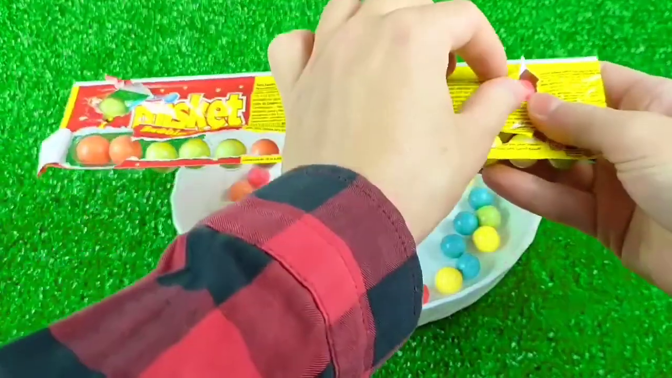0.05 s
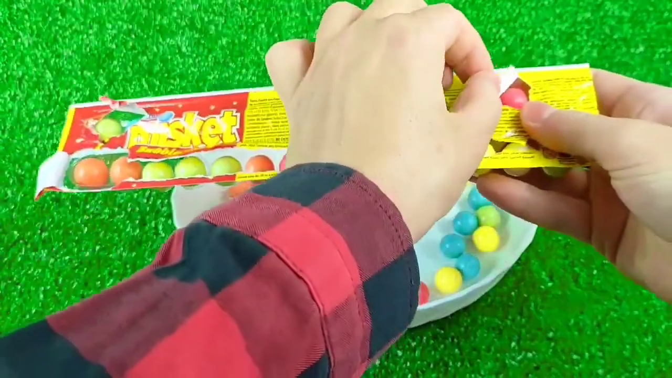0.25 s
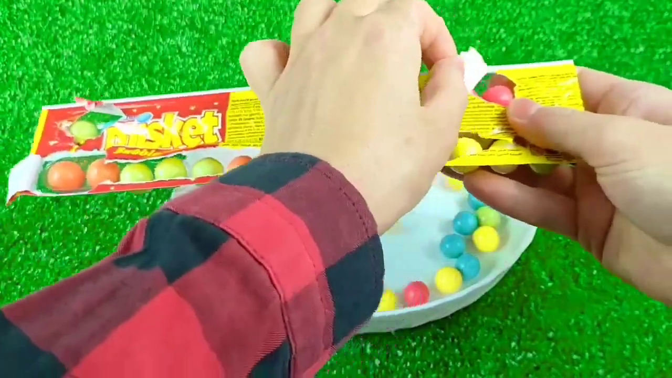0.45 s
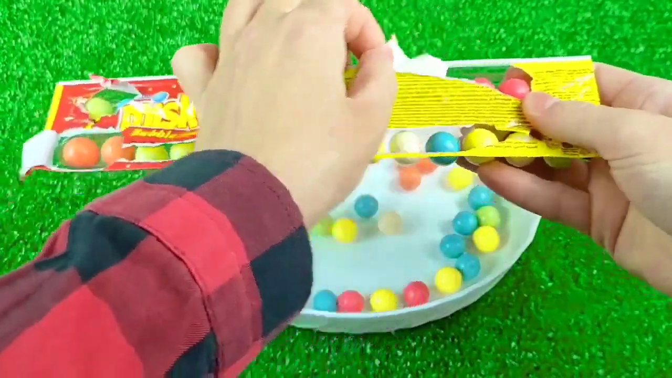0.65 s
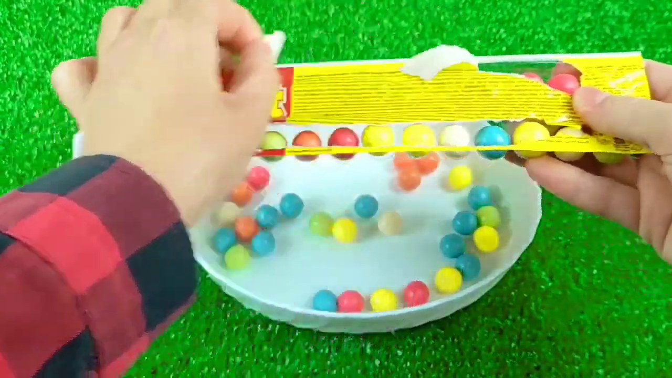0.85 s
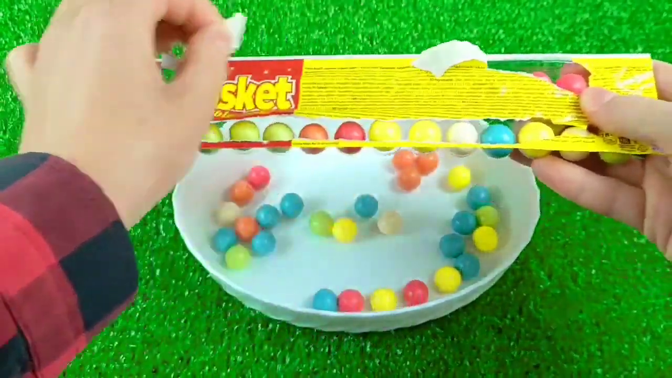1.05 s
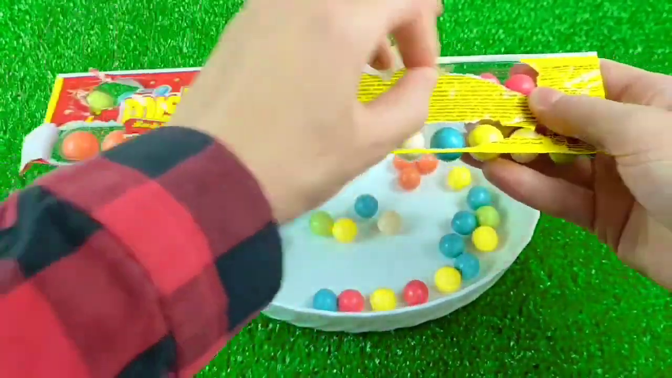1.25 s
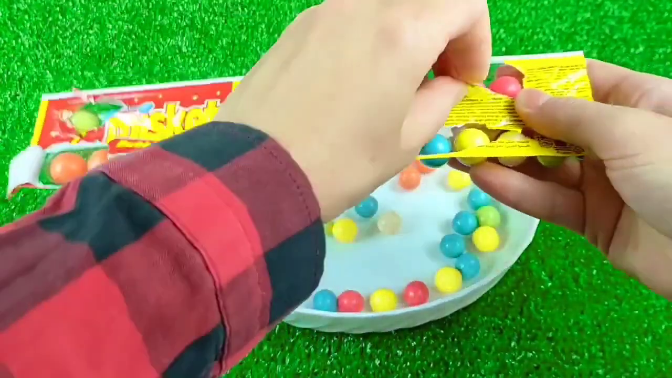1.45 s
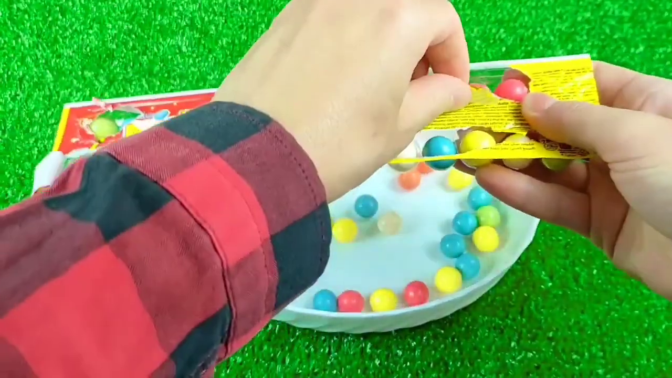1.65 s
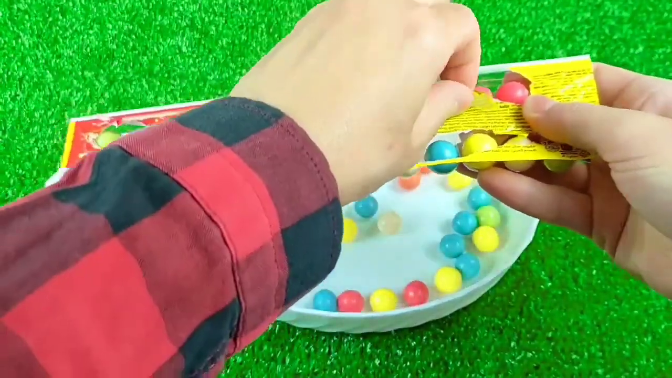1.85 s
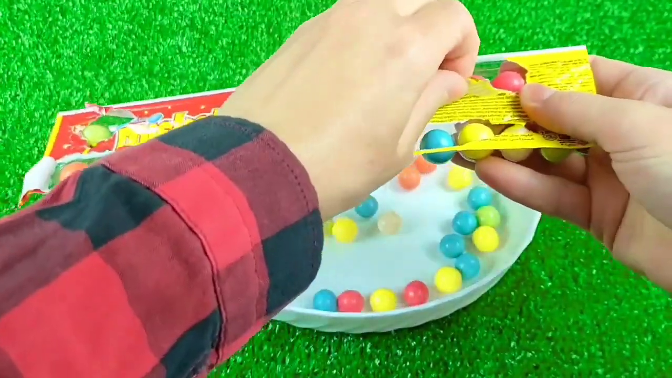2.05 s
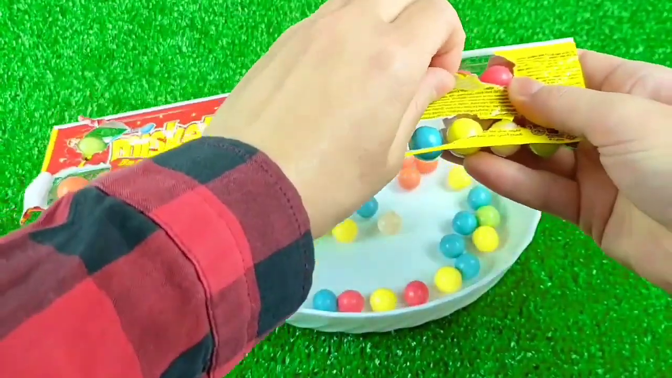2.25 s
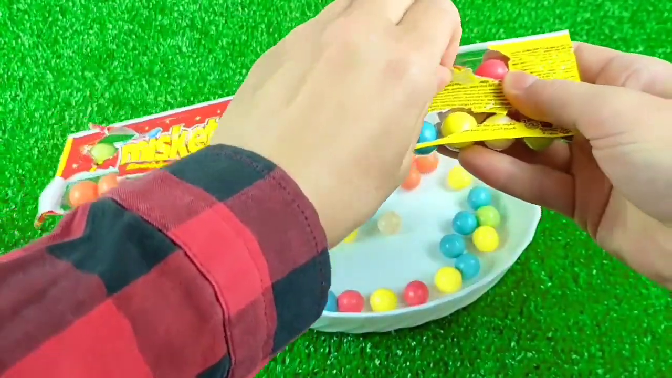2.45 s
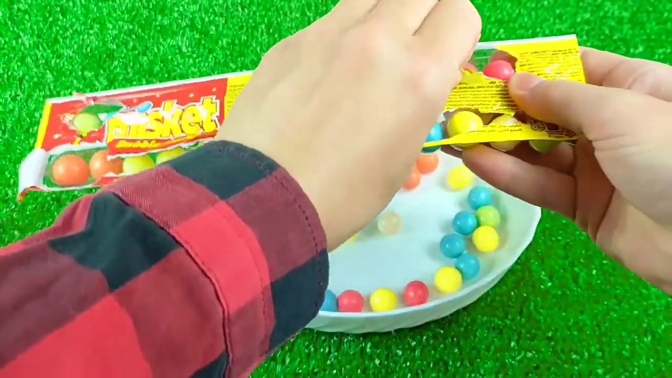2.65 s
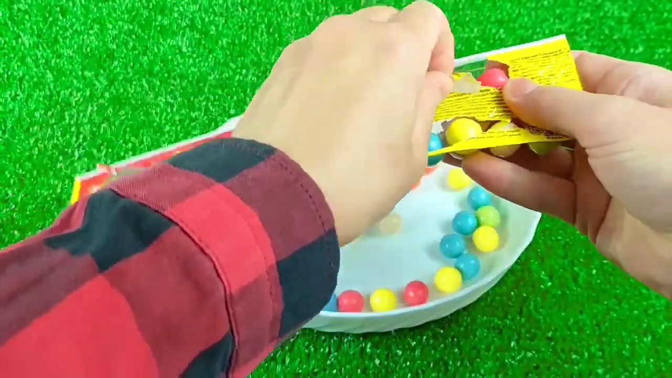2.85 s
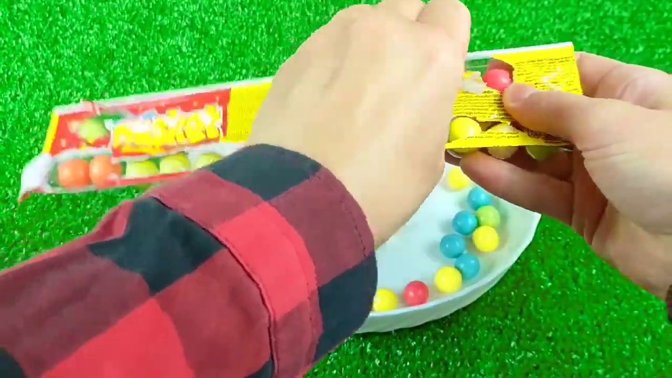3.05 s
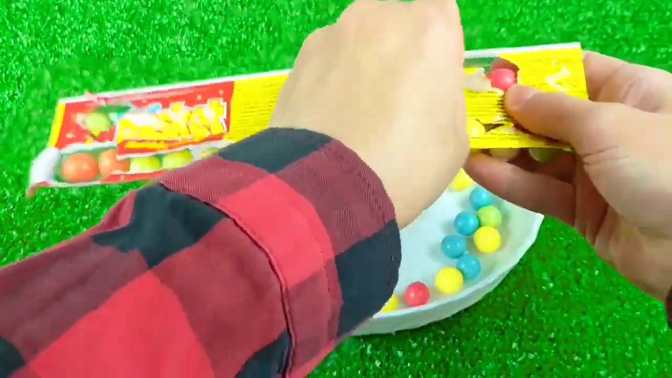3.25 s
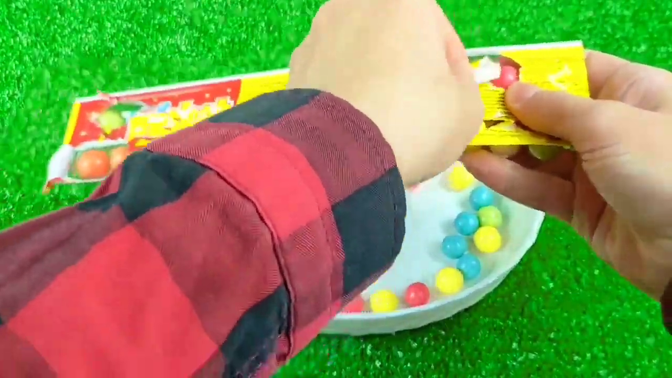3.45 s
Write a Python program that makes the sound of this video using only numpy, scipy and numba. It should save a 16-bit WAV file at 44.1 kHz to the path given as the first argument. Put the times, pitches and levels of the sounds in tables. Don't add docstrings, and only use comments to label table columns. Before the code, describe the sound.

Crinkly plastic candy packaging being torn by hand, with sharp crackles and snaps, close up

```python
import sys
import numpy as np
from scipy import signal
from scipy.fft import rfft, irfft
from scipy.io import wavfile
from scipy.ndimage import uniform_filter1d, map_coordinates
from numba import njit

SR = 44100
rng = np.random.default_rng(int(sys.argv[2]) if len(sys.argv) > 2 else 0)


def generate_wav(signal):
    frames = np.transpose(np.atleast_2d(signal))
    scaled = np.clip(frames, -1, 1) * 32767
    pcm = np.round(scaled).astype(np.int16)
    wavfile.write(sys.argv[1], SR, pcm)


def voltage_ratio(decibels):
    exponent = np.asarray(decibels, float) / 20
    return 10 ** exponent


N = 156555
TOP_HZ = 15300
PORT_LAG_S = 0.00007


def spectrum_db(points, hz):
    point_hz, point_db = np.array(points).T
    return np.interp(np.log(np.maximum(hz, 1)), np.log(np.maximum(point_hz, 1)), point_db)


@njit
def ring(n, at, hz, cycles, size):
    y = np.zeros(n)
    for k in range(len(at)):
        first = int(at[k]) + 1
        late = first - at[k]
        rate = (2j * np.pi - np.log(1000.) / cycles[k]) * hz[k] / SR
        turn = np.exp(rate)
        z = size[k] * np.exp(rate * late)
        fade = np.exp(-2 * hz[k] / SR)
        onset = np.exp(-2 * hz[k] / SR * late)
        for j in range(max(first, 0), min(n, first + int(cycles[k] * SR / hz[k]))):
            y[j] += z.imag * (1 - onset) ** 2
            z *= turn
            onset *= fade
    return y


def place(s, hz, cycles, size, pan_db, lag_s):
    hz = np.clip(hz, 30., .4 * SR)
    half_lag_s = lag_s / 2 / (1 + (hz / 5000) ** 2)
    ports = []
    for side in (1, -1):
        at = (s + side * half_lag_s) * SR
        ports.append(ring(N, at, hz, cycles + 0 * s, size * voltage_ratio(side * pan_db / 2)))
    return np.array(ports)


def walk(rate_hz):
    k = int(SR / rate_hz)
    steps = np.repeat(rng.standard_normal(N // k + 1), k)
    drift = uniform_filter1d(steps, k)[:N]
    return drift / drift.std()


def crinkle(count=70000):
    # time in seconds, effort in dB, brightness in dB per octave.
    grip = [
        (0, -31, 1),
        (0.038, -57, -4),
        (.095, -37, -2),
        (0.116, -35, -1),
        (0.179, -44, -3),
        (0.206, -30.5, -2),
        (.3, -33.5, -1.5),
        (.39, -39.5, -0.5),
    ]
    tear = [
        (0.41, -35.5, 3.4),
        (0.516, -19, 0.93),
        (0.578, -25.5, -0.58),
        (0.669, -22.5, 0.57),
        (.72, -16.5, 0.54),
        (0.912, -15, 1),
        (0.944, -21, 0.43),
        (0.957, -33, -0.83),
        (1.05, -39, -.7),
    ]
    drop = [
        (1.12, -35.5, -2.5),
        (1.22, -37.5, -2.2),
        (1.27, -38.5, -2),
        (1.34, -48, -1.8),
        (1.44, -63, -0.84),
        (1.513, -52, -0.42),
    ]
    pick = [
        (1.528, -26.5, -2.6),
        (1.58, -28.5, -1.6),
        (1.62, -28, -2.1),
        (1.68, -36.5, -2),
        (1.78, -28, -0.64),
        (1.85, -43.5, -0.46),
        (1.948, -40.5, 1),
        (1.976, -25, 1),
        (2.043, -36.5, 0.22),
    ]
    pull = [
        (2.056, -16.5, 0.88),
        (2.12, -31, -0.13),
        (2.22, -39.5, 0.97),
        (2.279, -37, 1.5),
        (2.349, -15, 1.7),
        (2.401, -37, 3.4),
        (2.445, -46.5, 3.2),
        (2.584, -25.5, 0.63),
        (2.688, -38.5, 0.15),
    ]
    rip = [
        (2.72, -18.5, 1),
        (2.8, -34.5, -0.1),
        (2.929, -45.5, -1.4),
        (3.005, -46.5, -0.9),
        (3.017, -33.5, 1),
        (3.16, -46.5, -0),
        (3.22, -26.5, -0.8),
        (3.38, -37, 0.2),
        (3.55, -36, 0.9),
    ]
    # frequency in Hz, level in dB per Hz.
    film_db = [(300, 0.5), (600, -13.5), (950, -6.5), (2200, -9.5), (4300, -1.5), (5500, -3.5),
               (8000, -12.5), (14500, -22)]
    # frequency in Hz, boost in dB.
    card = [(980, 6.5), (1880, 6), (2800, 8.5), (4200, 6), (6300, 3)]
    # start in seconds, end in seconds, pitch in Hz, boost in dB.
    taut = [
        (.47, 0.556, 2660, 0.5),
        (0.752, 0.898, 4100, 5.5),
        (0.894, 0.94, 2480, 5),
        (1.325, 1.41, 1100, 10),
        (1.52, 1.598, 1020, 4),
        (2.33, 2.453, 5930, 2.5),
        (2.69, 2.82, 5800, 7),
    ]
    taut_q, flurries_per_s, patch_db, flutter_db, scatter_db = 11.7, 18, 4, 2.08, 1.7
    u, g = rng.random((count, 3)).T, rng.standard_normal((count, 3)).T
    s, hz = u[0] * N / SR, 200 * 78 ** np.sqrt(u[1])

    effort_s, effort_db, tilt_db = np.array(grip + tear + drop + pick + pull + rip).T
    db = np.interp(s, effort_s, effort_db)
    db += np.interp(s, effort_s, tilt_db) * np.log2(hz / 3500)
    db += spectrum_db(film_db, hz) + 10 * np.log10(hz / 3500) * 1.28
    for f, boost_db in card:
        db += boost_db / (1 + ((hz - f) / f * 10) ** 2)
    for start, end, f, boost_db in taut:
        db += boost_db * ((s > start) & (s < end)) / (1 + ((hz - f) / f * taut_q) ** 2)

    patches = rng.standard_normal((int(N / SR * 30) + 2, 30))
    colour = map_coordinates(patches, [s * flurries_per_s, 4 * np.log2(hz / 200)], order=1)
    db += patch_db * colour / np.maximum(hz / 5000, 1)
    db += flutter_db * walk(45.22)[(s * SR).astype(int)]
    db += 0.73 - scatter_db * (np.log(u[2]) + 1)

    cycles = 12.96 * np.exp(g[0] / 2) * np.maximum(hz / TOP_HZ * 2, 1) ** 2
    size = voltage_ratio(db) * np.sign(g[0] * g[1])
    return place(s, hz, cycles, size, 3 * g[1], PORT_LAG_S * g[2])


def release(table, count=40):
    spread_s, rustle_s, onset_s = 0.0011, .012, 0.000816
    snap_db, body_db, crack_db, rustle_db = 5.5, -7.5, -8.5, -28
    s, db, hz, treble_db = np.array(table).T[:, :, None]
    u, g = rng.random((len(s), count, 2)), rng.standard_normal((len(s), count, 3))
    role = np.arange(count)
    main, crack, rustle = role < 1, (role >= 8) & (role < 24), role >= 24
    others = ~main

    cluster_s = spread_s * others * (g[..., 2] + .5)
    late_s = np.where(rustle, -np.log(u[..., 0]) * rustle_s, cluster_s) + onset_s
    body_hz = np.sqrt(hz * np.where(main, hz, 3200)) * 2 ** (0.57 * g[..., 0] * others)
    f = np.where(crack, 7500 * 2 ** u[..., 1], body_hz)

    level = np.where(rustle, rustle_db, body_db * others)
    level = db + snap_db + np.where(crack, treble_db + crack_db, level)
    level = level + 1.73 * g[..., 1] * others
    level = level - 0.92 * np.maximum(np.log2(f / 6000), 0) * ~crack
    level = level - 1.3 * np.maximum(np.log2(900 / f), 0)
    cycles = 7.08 * np.where(crack, 3.5, np.where(main, 1.6, 1))
    size = voltage_ratio(level) * np.sign(u[..., 0] - .5)
    pan_db = g[:, :1, 0] + 2 * g[..., 1]
    lag_s = PORT_LAG_S * 0.77 * g[:, :1, 1]

    def flat(v):
        return (v + 0 * f).ravel()

    return place(flat(s + late_s), flat(f), flat(cycles), flat(size), flat(pan_db), flat(lag_s))


def snaps():
    # time in seconds, peak in dB, ring in Hz, treble in
    # dB.
    creases = [(0.1002, -12, 4170, -19.5), (0.1055, -9.5, 3900, -33), (0.2083, -2, 3840, -26),
               (0.2224, -6, 3640, -37), (0.2915, -2, 3780, -23), (0.607, -12.5, 1480, 0),
               (0.6988, -0.5, 3700, -16), (0.7157, -3.5, 3830, -17), (0.7535, -17, 3040, -36),
               (0.7963, -1.5, 4040, -27), (0.9094, 0, 2640, -13), (1.2496, -15, 3000, -41),
               (1.286, -16, 3280, -45), (1.3242, -23.5, 2570, -31),
               (1.5277, -9, 4100, -45), (1.6172, 0, 4250, -44), (1.6203, -6, 2680, -34),
                     (1.6306, -8.5, 2750, -41), (1.6943, 1, 2720, -22), (1.772, -19, 4840, -40),
                     (1.866, -22, 2860, -12), (1.9199, -14, 4250, -3.5), (1.9759, -3, 5000, -12),
                     (2.005, -8, 1610, -23), (2.053, -1, 1960, -8), (2.0681, -6, 1970, -25),
                     (2.1098, 1, 5940, -11.5), (2.153, -7, 3920, -27), (2.1945, -13.5, 5760, -10),
                     (2.236, -6, 4860, -18), (2.2663, -15.5, 4600, -23), (2.3007, -0.5, 4540, -22),
                     (2.327, -4, 3040, -17),
               (2.3515, 4.5, 5600, -16.5), (2.4559, -8, 3780, -20), (2.518, -8.5, 3280, -7.5),
                (2.58, -4.5, 3140, -8), (2.6335, -14, 1610, -19), (2.7017, 0, 4350, -21),
                (2.7176, 6, 5030, -21), (2.7264, -3, 3800, -5.5), (3.017, -7.5, 2860, -4.5),
                (3.0234, -3.5, 5240, -11.5), (3.035, -19, 1460, -23), (3.0645, -30, 2020, -19),
                (3.0749, 1, 4700, -25.5), (3.171, -19.5, 3070, -30), (3.189, -9, 4100, -25),
                (3.198, -30, 3930, -23), (3.21, 5, 4030, -24), (3.2603, -1.5, 4170, -15.5),
                (3.4064, -8.5, 4800, -11.5), (3.442, -13, 2680, -22)]
    return release(creases)


def ticks():
    # time in seconds, peak in dB, ring in Hz.
    more_creases = [(0.0697, -23, 3120), (0.184, -17, 3900), (0.2596, -22, 3520), (0.4116, -4, 3520),
                    (0.4213, -10, 1790), (0.4289, -9.5, 1920), (0.4445, -11, 3950), (0.4636, -7, 3940),
                    (0.4652, 1, 2820), (0.4754, -3, 2800), (0.5025, -5, 2580), (0.5078, -1.5, 1920),
                    (0.517, -2, 2650), (0.5308, -3.5, 2600), (0.5587, -6, 2650), (0.568, -6, 3120),
                    (0.5783, -6, 3100), (0.598, -6.5, 1870), (0.6644, -2, 2600), (0.7545, 5.5, 2970),
                    (0.7744, 4, 3130), (0.8064, -12, 3800), (0.8184, -9, 4150), (0.8295, -7, 3860),
                    (0.839, -5, 4210), (0.8564, -7, 4100), (0.867, -9, 4230), (0.8825, -14, 2890),
                    (0.897, -3, 2760), (0.9422, -2, 2680), (1.0162, -10.5, 2790), (1.1168, -22, 2410),
                    (1.1972, -28, 4130), (1.2094, -21, 2250), (1.2362, -18, 3000), (1.277, -26, 3260),
                    (1.2964, -28, 2060), (1.36, -29.5, 1120), (1.4045, -32, 1450), (1.4411, -31, 3360),
                    (1.484, -26.5, 4170), (1.5555, -25, 2720), (1.886, -12, 6460), (2.0895, -3, 3160),
                    (2.2456, -17, 4610), (2.2874, -7.5, 3770), (2.3165, -5.5, 1740), (2.362, -4, 5560),
                    (2.3702, 0, 5860), (2.4596, -4, 3700), (2.479, -7, 3730), (2.4997, -9, 3920),
                    (2.5214, -9, 2680), (2.564, -27, 2680), (2.5866, -4, 2840), (2.6045, -16, 4300),
                    (2.8865, -18.5, 1220), (2.915, -22, 3700), (2.9866, -24, 1920), (3.502, -12.5, 3860)]
    level_db, treble_db = -6.5, -15
    return release([(s, db + level_db, hz, treble_db) for s, db, hz in more_creases])


def palm(count=200):
    # start in seconds, length in seconds, level in dB.
    rubs = [
        (0.198, 0.21, -45),
        (0.745, .28, -42),
        (0.98, 0.32, -33.5),
        (1.537, 0.28, -29),
        (2.054, 0.13, -31),
        (2.304, .3, -42),
        (2.714, .25, -40),
        (3.211, 0.23, -26.5),
    ]
    s, length_s, db = np.array(rubs).T[:, :, None]
    u, g = rng.random((len(s), count)), rng.standard_normal((len(s), count, 2))
    at_s = (s + length_s * u ** 2).ravel()
    spot = g[..., 0].ravel()
    hz = 520 * 2 ** (0.61 * np.tanh(spot))
    size = (voltage_ratio(db - 10 * u) * g[..., 1]).ravel()
    return place(at_s, hz, 6.3, size, 2 * spot, 0.)


def knocks():
    # time in seconds, level in dB, pitch in Hz.
    thumps = [
        (0.604, -13, 427),
        (2.107, -19, 99),
        (2.111, -22, 240),
        (2.111, -12, 520),
        (2.193, -21, 161),
        (2.195, -27, 450),
        (2.714, -40, 60.6),
        (3.209, 5, 1000),
    ]
    s, db, hz = np.array(thumps).T
    return place(s, hz, 2.5, voltage_ratio(db), 3.9 + 0 * s, 0 * s)


def room(x):
    wash_db, t60_s, dull_hz = -10.5, 0.33, 9200
    t = np.arange(SR // 2) / SR
    onset = np.clip(t / 0.0013 - .5, 0, 1)
    tail = rng.standard_normal((2, len(t))) * voltage_ratio(-60 * t / t60_s) * onset
    tail = signal.sosfilt(signal.butter(1, dull_hz, fs=SR, output="sos"), tail)
    tail = tail / np.sqrt((tail ** 2).sum(axis=1, keepdims=True))
    return voltage_ratio(wash_db) * signal.fftconvolve(x.mean(axis=0)[None], tail, axes=1)[:, :N]


def air():
    # frequency in Hz, level in dB per Hz.
    hiss_db = [(25, 4.5), (150, -5.5), (400, -14), (1200, -22), (4000, -21), (12000, -35)]
    level_db, wander_db = -53, 1.5
    port_db = np.array([[-1.4], [1.4]])
    hz = np.arange(N // 2 + 1) * SR / N
    x = irfft(rfft(rng.standard_normal((2, N))) * voltage_ratio(spectrum_db(hiss_db, hz)), N)
    return x / x.std() * voltage_ratio(level_db + port_db + wander_db * walk(6.03))


def scene():
    film = crinkle() + snaps() + ticks()
    thin = signal.butter(2, 624, "high", fs=SR, output="sos")
    pack = signal.sosfilt(thin, film) + palm()
    return pack + room(pack) + knocks() + air()


def band_limit(x):
    return signal.sosfilt(signal.butter(12, 16190, fs=SR, output="sos"), x)


def record(dry):
    soft = signal.sosfilt(signal.cheby1(8, .5, TOP_HZ, fs=SR, output="sos"), dry)
    mix = np.clip(soft, -1, 1)
    return band_limit(mix)


dry = scene()
out = record(dry)
generate_wav(out)
```